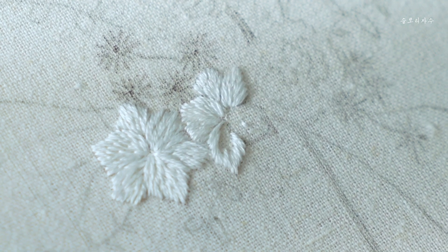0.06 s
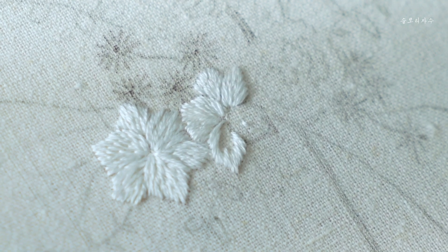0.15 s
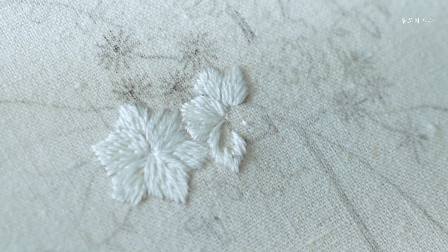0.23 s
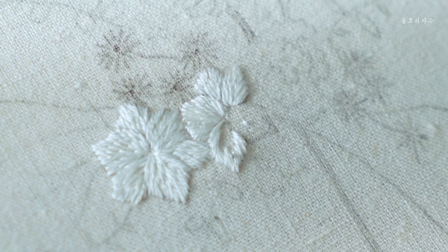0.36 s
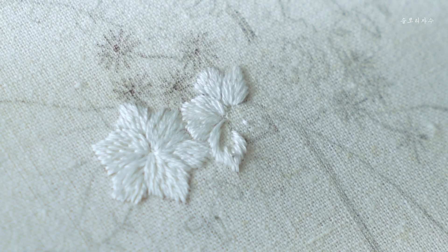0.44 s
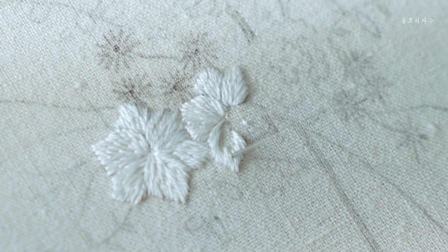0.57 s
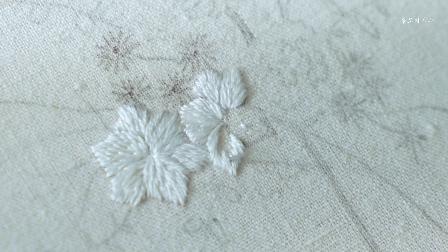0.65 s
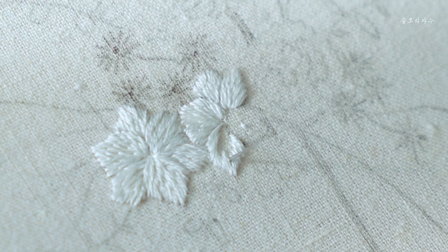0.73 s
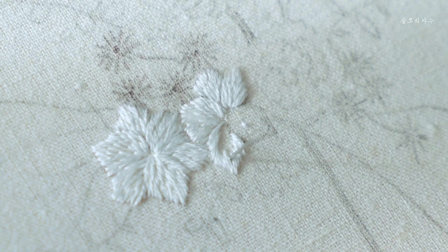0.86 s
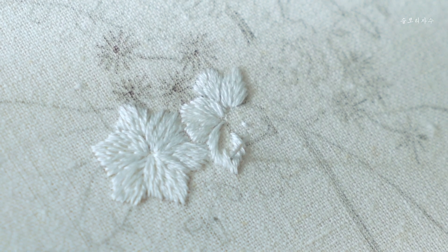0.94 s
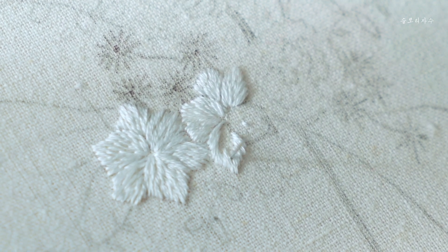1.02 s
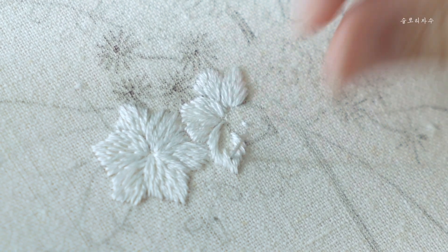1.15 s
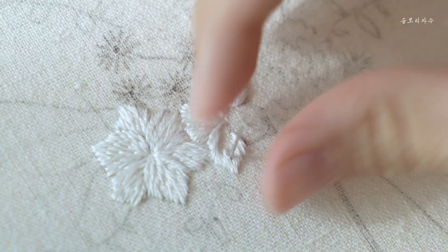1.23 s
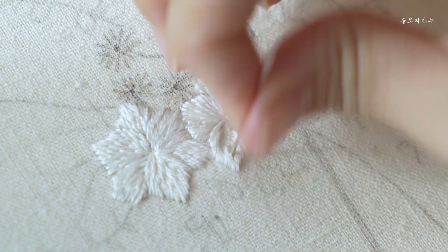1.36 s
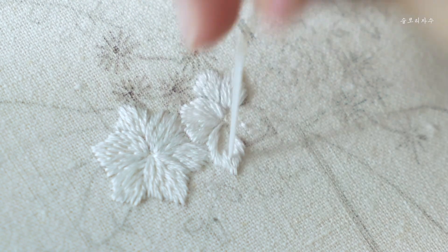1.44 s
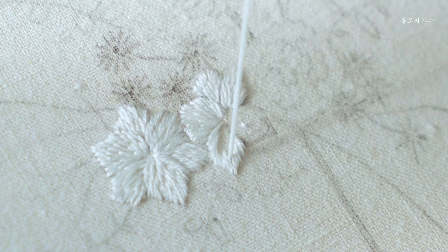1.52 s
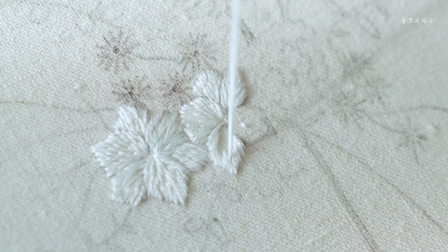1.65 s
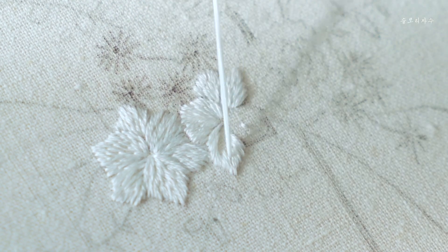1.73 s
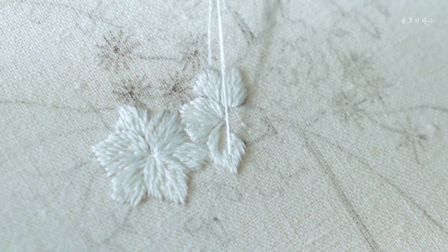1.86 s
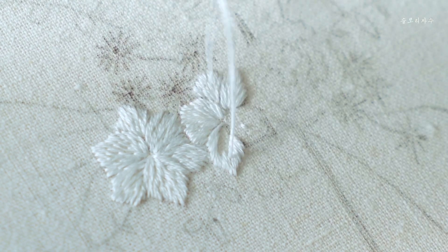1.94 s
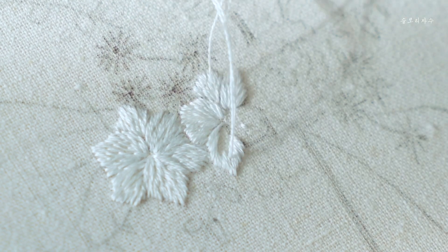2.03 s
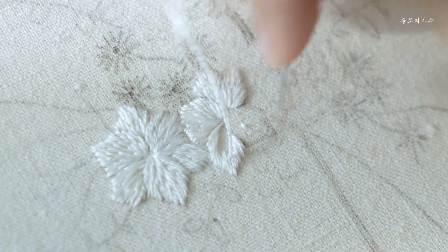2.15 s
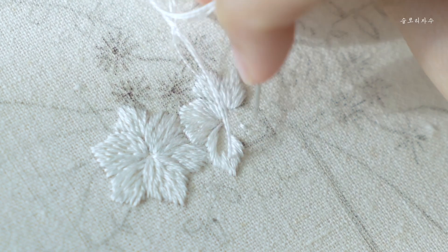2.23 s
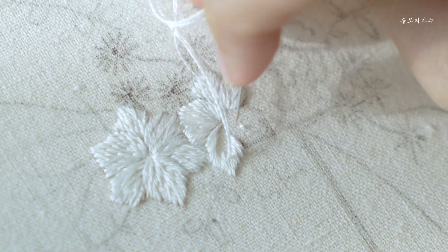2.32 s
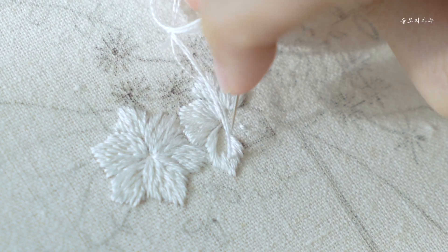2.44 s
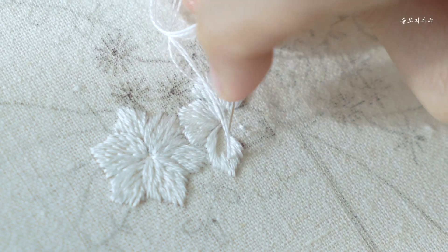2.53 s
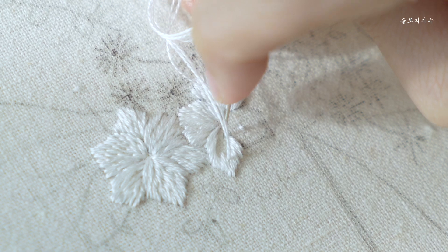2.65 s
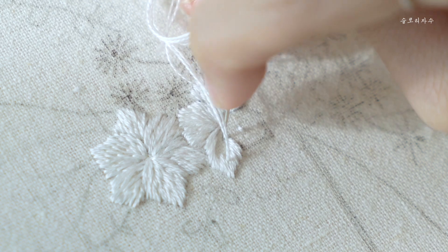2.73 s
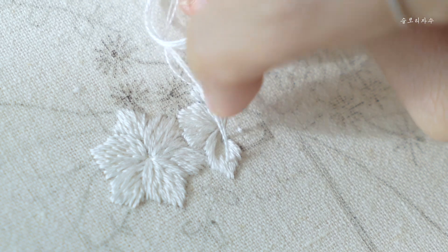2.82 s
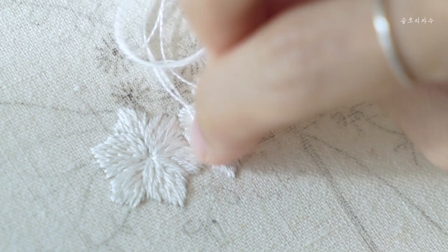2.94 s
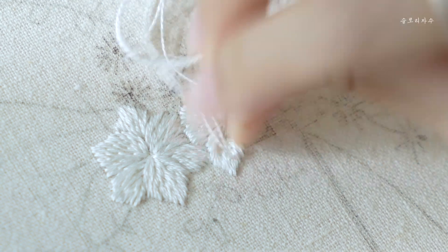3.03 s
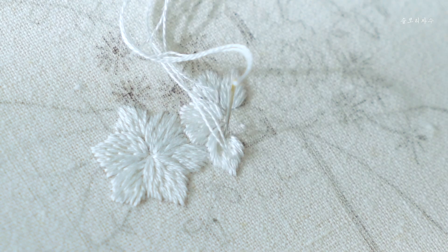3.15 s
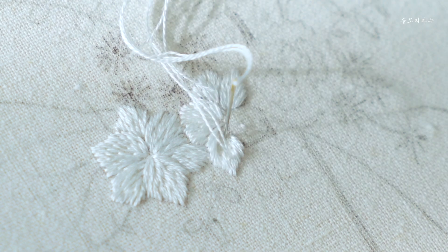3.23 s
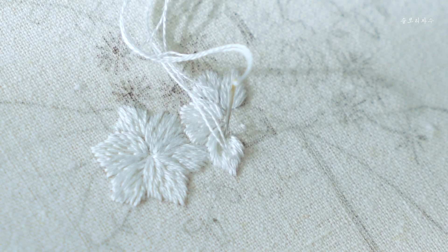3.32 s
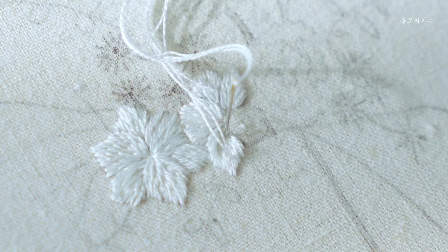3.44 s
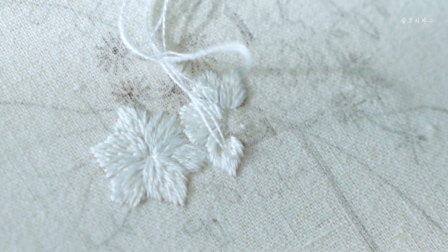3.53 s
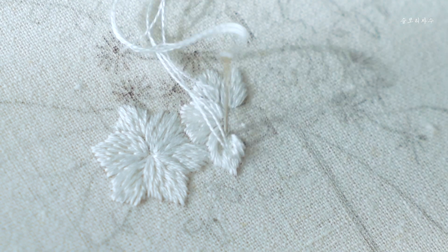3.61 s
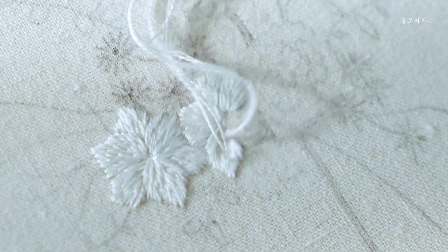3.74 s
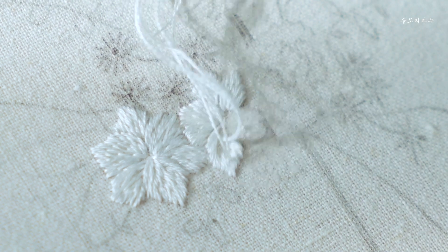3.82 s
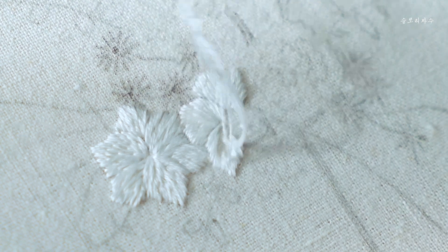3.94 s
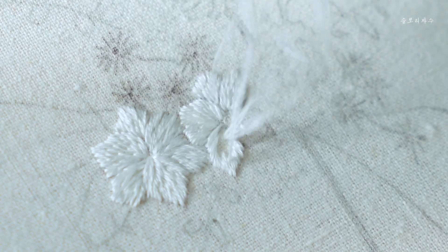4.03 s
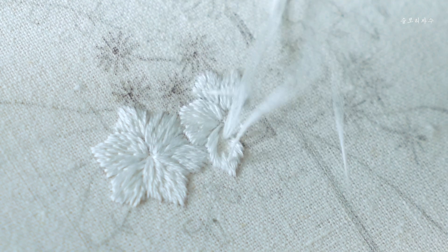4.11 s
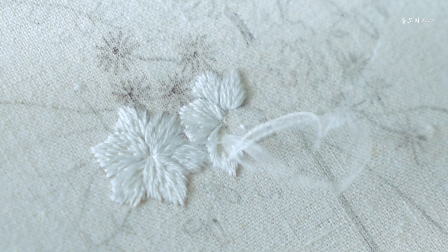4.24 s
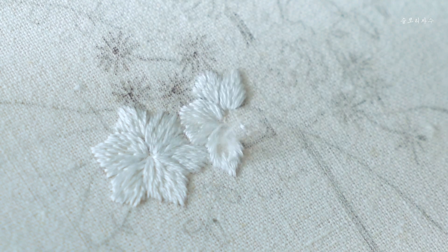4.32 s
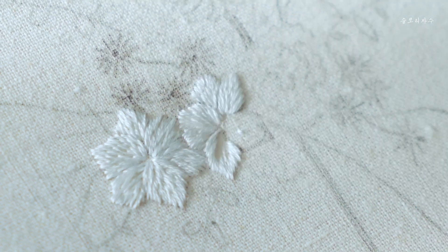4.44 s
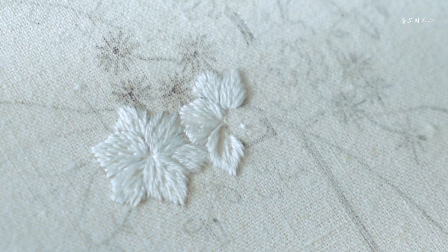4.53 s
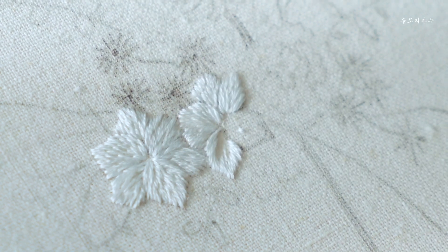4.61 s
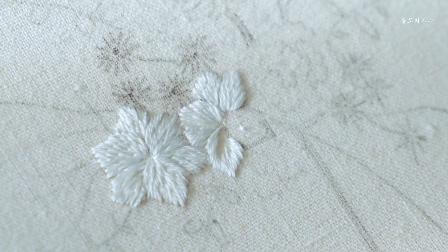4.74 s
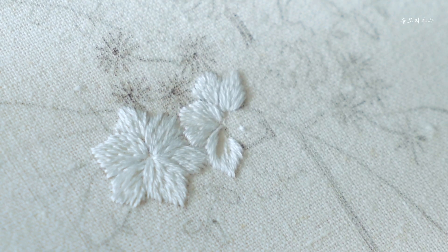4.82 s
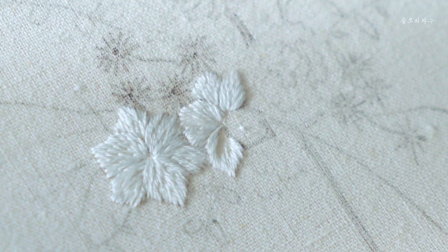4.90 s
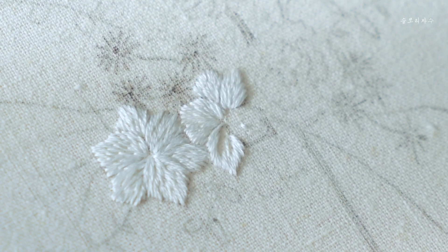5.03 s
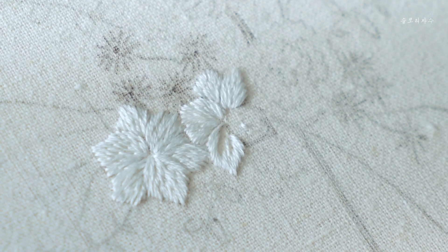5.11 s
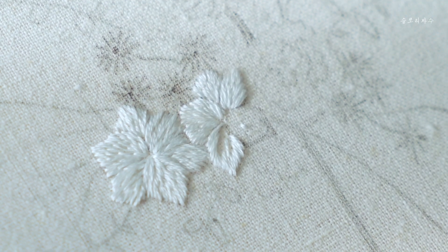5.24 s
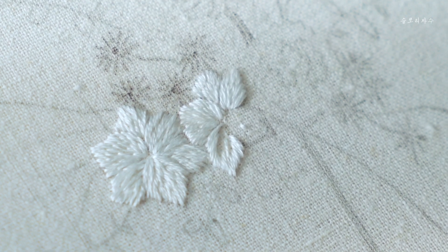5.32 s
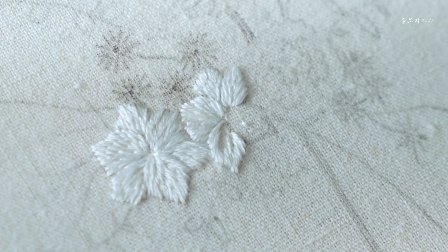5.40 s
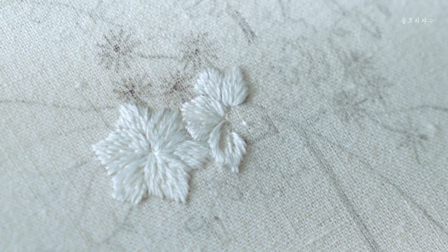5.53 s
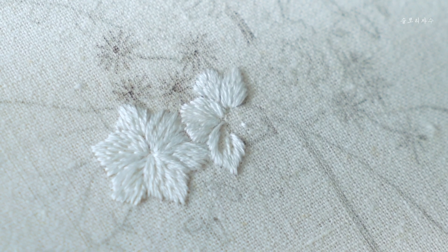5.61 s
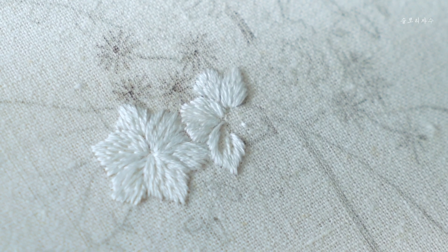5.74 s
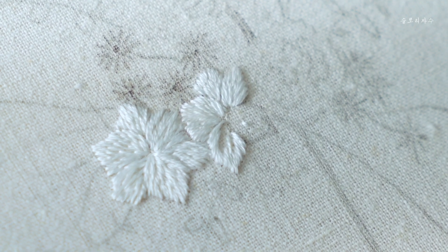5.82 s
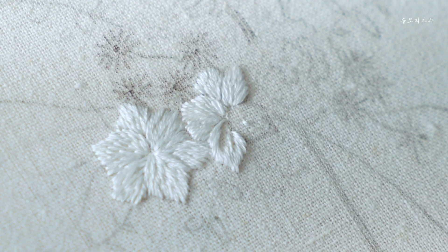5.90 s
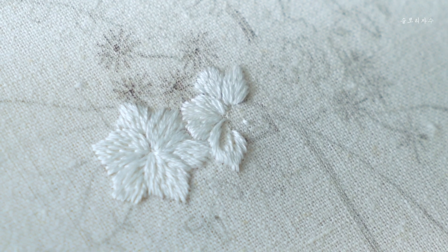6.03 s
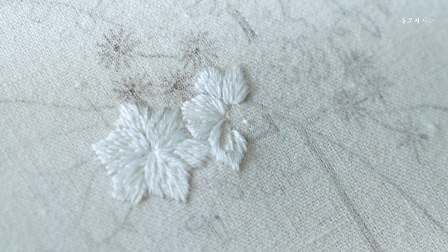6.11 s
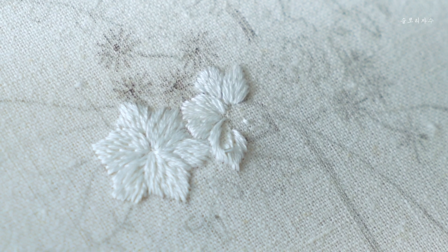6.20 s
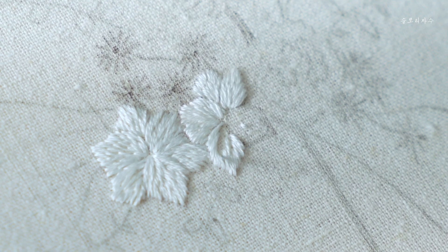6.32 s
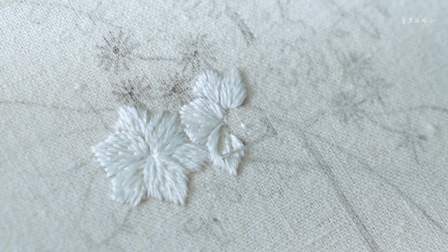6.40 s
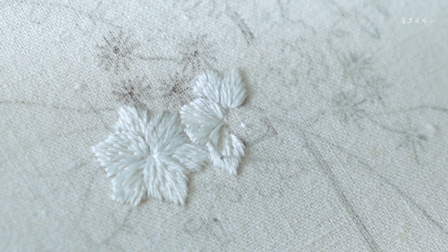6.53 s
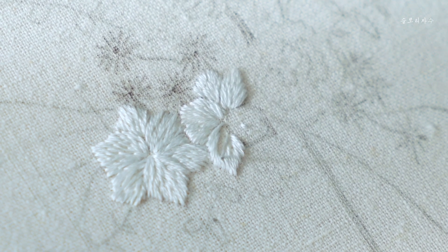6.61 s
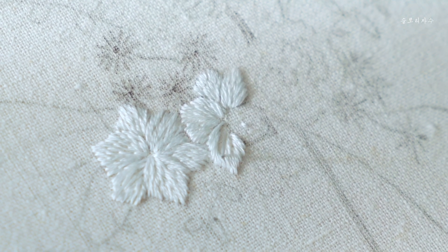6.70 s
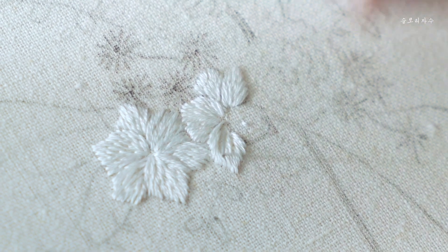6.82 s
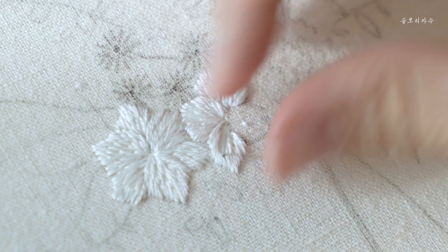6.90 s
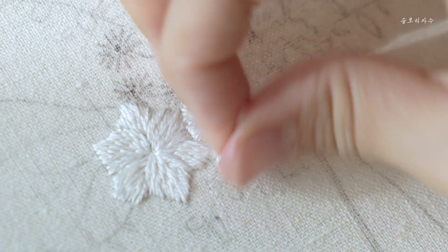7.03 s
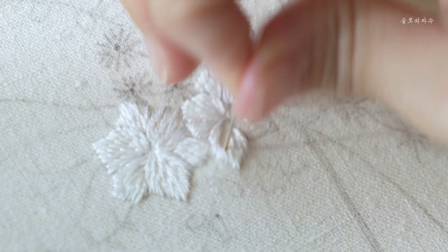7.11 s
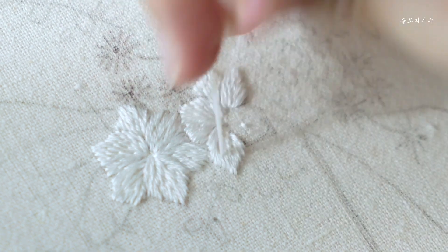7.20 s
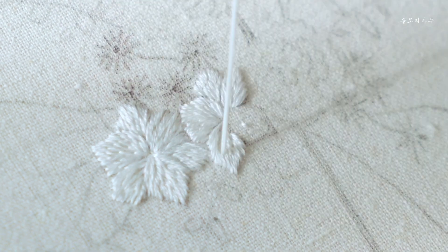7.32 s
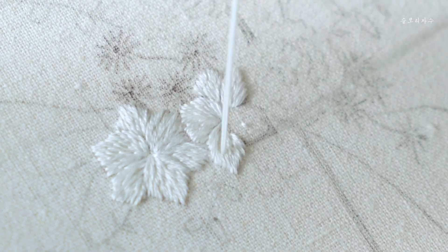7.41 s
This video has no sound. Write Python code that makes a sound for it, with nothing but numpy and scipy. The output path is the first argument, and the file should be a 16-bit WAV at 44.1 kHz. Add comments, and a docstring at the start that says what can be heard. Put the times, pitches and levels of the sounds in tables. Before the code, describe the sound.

Close hand embroidery on taut cloth: soft drum-like thumps, small needle ticks, and raspy, hissing thread pulls over steady low noise in a quiet room.

```python
"""Hand embroidery close to a stereo microphone, whose own steady noise lies under everything in a quiet room.
Cloth stretched in a hoop is a small soft drum: thumps by fingers and the needle's eye ring it from the start.
Light brushing follows, and just after 1 s the needle point ticks through. From about 1.4 s a strong thump leads
into a long pull: dragged thread shakes the same drum while its fibres hiss. Two more pulls come after 4 s,
then small thumps and brushes, a tick near 6.8 s, and the strongest thump with a pull that lasts to the end."""
import sys
import numpy as np
from scipy import signal
from scipy.fft import rfft, irfft, next_fast_len
from scipy.io import wavfile
from scipy.ndimage import uniform_filter1d

SR = 44100
rng = np.random.default_rng(int(sys.argv[2]) if len(sys.argv) > 2 else 0)


def transcribe(u):
    """Save the signal u as a 16-bit wav file named by the first command-line argument.

    u: samples, shape (n,) or (channels, n), limited to [-1, 1]; the rate is SR.
    q: integer samples, one column per channel.
    """
    v = np.clip(np.atleast_2d(u).T, -1, 1)
    q = np.round(v * 32767).astype(np.int16)
    wavfile.write(sys.argv[1], SR, q)


N = 328983  # length in samples

# Blows on the cloth. Each row: start in seconds, strength in dB, crack in dB (before a 0.5 dB lift),
# contact time in milliseconds, tilt in dB per octave.
THUMPS = [(0.06, -57, -45, 0.74, 10.5), (.1940, -49, -53, 0.82, 0), (.1980, -41.5, -53, 0.68, 3),
          (0.618, -67, -66, 0.82, -14.5), (1.321, -49, -75, 1.9, -4.5), (1.43, -24, -63, 1.36, -1),
          (1.4430, -13, -33, 0.77, -2.5), (1.4604, -42, -40, 1.05, 9), (2.229, -54.5, -72, 0.95, -7),
          (3.0328, -46, -61, 0.83, -3.5), (3.094, -54, -71, 1.6, -11), (3.616, -49, -70, 1.4, -2),
          (3.646, -58, -53, 1.1, 13.5), (3.8262, -42, -64, 0.94, 8.5), (3.8298, -24, -60, 1.78, 5.5),
          (4.05, -35.5, -41, 0.89, 4.5), (4.056, -21, -37, 1.8, -3.5), (4.691, -33, -42, 1.01, 7.5),
          (5.418, -54, -47, 0.33, -10.5), (5.869, -50.5, -70, 1.1, 7.5), (6.1149, -49.5, -54, 0.59, -3),
          (6.2505, -54, -59, .8, 6), (6.39, -52.5, -60, 0.73, -10), (6.548, -46, -70, 1.4, -3),
          (7.171, -30, -66, 1.17, 3.5), (7.174, -32, -70, 2.1, -3.5), (7.217, -9, -29.5, 0.94, -1)]


def undb(db):
    """Turn decibels into a gain."""
    return 10 ** (np.asarray(db) / 20)


def unit(x):
    """Scale to an rms (average strength) of 1."""
    return x / np.sqrt(np.mean(x ** 2))


def pan(x, db):
    """Place a sound between the channels by its left minus right level in dB."""
    return x * undb(np.array([[db], [-db]]) / 2)


def band(x, hz, width):
    """Resonant band-pass: let through what lies around hz."""
    return signal.lfilter(*signal.iirpeak(hz, hz / width, fs=SR), x)


def ring(x, hz, t60):
    """One mode, dying by 60 dB in t60 seconds, heard as its velocity; it builds up over about a cycle."""
    decay = np.exp(-np.log(1000) / (max(t60, 0.002) * SR))
    turn = 2 * np.pi * hz / SR
    velocity = signal.lfilter([1, -decay * np.cos(turn)], [1, -2 * decay * np.cos(turn), decay ** 2], x)
    return band(velocity, hz, 2.37 * hz)  # the slow build-up makes low modes come late


def slips(rate, spread_db):
    """Stick-slip: random jerks, about rate a second, of very uneven size and either sign; rms 1."""
    when, size, sign = rng.random((3, N))
    strength = undb(-spread_db * np.log(1 - size))
    return unit((when < rate / SR) * strength * np.sign(sign - 0.5))


def walk(rate):
    """Random levels held for 1 / rate seconds and smoothed twice; spread near 1."""
    hold = int(SR / rate)
    steps = np.repeat(rng.standard_normal(N)[:N // hold + 1], hold)[:N]
    return 1.16 * uniform_filter1d(uniform_filter1d(steps, hold), hold)


def floor():
    """Steady self-noise of the two capsules, with a little shared room rumble."""
    # Colour of the noise. Each row: frequency in Hz, relative level per Hz in dB.
    noise_curve = [(15, -55), (25, -27), (52, -2), (149, -2), (223, -3.5), (256, -3), (384, -3.5),
                   (416, -5), (1440, -13.5), (1700, -14.5), (2840, -18), (14400, -24), (16000, -25)]
    curve_hz, curve_db = np.transpose(noise_curve)
    size = next_fast_len(N)
    hz = np.maximum(np.fft.rfftfreq(size, 1 / SR), 1)
    colour = undb(np.interp(np.log(hz), np.log(curve_hz), curve_db))
    own = rfft(rng.standard_normal((2, N)), size)
    shared = rfft(rng.standard_normal(N), size) * 0.5 / (1 + hz / 1500)
    noise = irfft(colour * (own + shared), size)[:, :N]
    return pan(unit(noise) * undb(-58.5), -0.054)


def cloth(drag_db, middle_db, rasp_db, drag_tilt):
    """Blows and the slipping thread ring the same drum modes; the dent of a blow is also heard directly."""
    # Modes of the stretched cloth. Each row: frequency in Hz, level in dB, time to fall 60 dB in seconds,
    # left minus right level in dB.
    drum_modes = [(71, 0.5, 0.088, -7), (118.3, -6.5, 0.055, -27.5), (150.8, 4, 0.1, -4),
                  (220, -4.5, 0.0067, -18.5), (281.7, 2, 0.093, -4.5), (323.2, -2.5, 0.11, 0.5),
                  (375.4, 3.5, 0.11, -5), (436, -43, 0.093, 9), (508, 0, 0.089, -0.5),
                  (611, -7, 0.085, -7.5), (773, -20.5, 0.29, -2), (924, -14, 0.05, 5),
                  (1020, -40, 0.017, -13), (1237, -6.5, 0.025, 1.5), (1358, -2.5, 0.016, -3.5),
                  (1467, -11, 0.039, -6.5), (1634, -15, 0.068, -1), (1727, -21.5, 0.094, -6)]
    # Rows of THUMPS, counted from 0, that push the cloth away from the microphone.
    downward_rows = [4, 5, 9, 10, 14, 15, 16, 24]
    middle_hz, rasp_hz = 430, 850  # where the middle and the high modes begin
    # how strongly the thread drives low, middle and high modes, and blows drive all of them (dB)
    drag_coupling_db, middle_coupling_db, rasp_coupling_db, blow_coupling_db = -35, -24.5, -17, -11

    jerks = slips(3000, spread_db=2.0)
    scatter = rng.standard_normal((len(THUMPS), len(drum_modes)))
    out, dent = np.zeros((2, N)), np.zeros(N)
    pushes = []
    for row, (start, blow_db, _, contact_ms, _) in enumerate(THUMPS):
        # softer contact = longer push
        push = np.hanning(int(np.clip(contact_ms, 0.05, 8) * SR / 1000) + 3)
        push = push * undb(blow_db) * (-1 if row in downward_rows else 1)
        pushes.append(push)
        i = int(start * SR)
        dent[i:i + len(push)] += push

    for k, (hz, mode_db, t60, pan_db) in enumerate(drum_modes):
        octaves = np.log2(hz / 300)  # tilts pivot at 300 Hz
        if hz <= middle_hz:
            rub_db = drag_db + drag_coupling_db + drag_tilt * octaves
        elif hz < rasp_hz:
            rub_db = middle_db + middle_coupling_db
        else:
            rub_db = rasp_db + rasp_coupling_db
        force = rng.permutation(jerks) * undb(rub_db)  # every mode feels its own run of slips
        for (start, blow_db, _, _, tilt), push, place in zip(THUMPS, pushes, scatter):
            i = int(start * SR)
            # each blow lands elsewhere and favours other modes
            kick_db = blow_db + blow_coupling_db + tilt * octaves + 1.5 * place[k]
            force[i:i + len(push)] += push / abs(push.sum()) * undb(kick_db)
        out += pan(undb(mode_db) * ring(force, hz, t60), pan_db)
    out += pan(band(dent, 1170, 2700), -6)
    # the weave damps anything faster than 2000 Hz
    return signal.sosfilt(signal.butter(4, 2000, fs=SR, output="sos"), out)


def cracks():
    """The brief dry snap of fibres at each blow: a burst of noise that fades within milliseconds."""
    out = np.zeros(N)
    t = np.arange(int(0.02 * SR)) / SR
    for start, _, crack_db, *_ in THUMPS:
        i = int(start * SR)
        out[i:i + len(t)] += undb(crack_db + 0.5) * rng.standard_normal(len(t)) * np.exp(-t / 0.003)
    return pan(band(out, 1800, 3400), -2.3)


def room(x):
    """Short diffuse echoes from the table and nearby walls, a little different in each channel."""
    t60 = 0.2  # seconds for the echoes to fall 60 dB
    t = np.arange(int(0.25 * SR)) / SR
    echoes = rng.standard_normal(len(t)) + 0.25 * rng.standard_normal((2, len(t)))
    echoes *= np.exp(-np.log(1000) * t / t60) * np.clip(t / 0.0089, 0, 1)  # swell in, then die away
    echoes = band(echoes, 670, 4300)
    echoes /= np.sqrt(np.sum(echoes ** 2, axis=1)[:, None])
    return x + undb(-14) * signal.fftconvolve(x, echoes, axes=1)[:, :N]


def drags():
    """Levels over time for the low, middle and high modes, hiss and air, and the tilt, from all rubbing."""
    # Fingers, needle and slack thread brush the cloth. Each row: loudest moment in seconds, swell in seconds,
    # fade in seconds, drag in dB, tilt in dB per octave, hiss in dB, air (upper hiss) over the hiss in dB.
    brush_rows = [(0.616, 0.066, 0.063, -55, 3.5, -66, 1.5), (0.75, 0.14, 0.045, -68, 4, -72, -0.5),
                  (1.335, 0.044, .04, -53, -2, -71, -1), (1.415, 0.067, 0.026, -47.5, 0.5, -65, -0.5),
                  (2.244, 0.027, .03, -65, -5, -70, -7), (2.28, 0.027, 0.08, -72, 3, -71, -1),
                  (2.96, 0.057, 0.087, -55.5, 0, -67, -5), (3.026, 0.09, .06, -57, 11, -65, -0.5),
                  (3.093, .035, 0.021, -53, -5, -65.5, -2), (3.61, 0.023, .05, -61.5, -7.5, -80, -3),
                  (3.646, 0.02, 0.054, -59, 7, -66, -3), (3.78, 0.1, 0.069, -52.5, 3, -68.5, -3),
                  (3.811, 0.035, 0.013, -48.5, -9.5, -76, -7), (3.955, 0.092, 0.033, -56.5, -4, -94, -0.5),
                  (5.272, 0.022, 0.048, -65, 1, -63, 1), (6.258, 0.052, 0.12, -51.5, 4, -67.5, -0.5),
                  (6.324, 0.052, 0.031, -52, 2, -66.5, -1.5), (6.39, 0.022, 0.11, -58.5, -5, -70, -3),
                  (6.56, 0.086, .06, -55.5, -0.5, -71, -7), (7.034, 0.073, 0.11, -62, -3, -65, -0.5),
                  (7.136, 0.063, .04, -48.5, -3, -63.5, -3.5), (7.165, 0.054, 0.016, -46.5, -6, -65, -8)]
    # Thread pulled through the weave, one curve a pull. Each row of a curve: time in seconds,
    # drag on the cloth in dB, sliding hiss in dB, tilt of the drum in dB per octave.
    pull_curves = [
        [(1.45, -46, -59, 0), (1.503, -37, -58, 3.5), (1.569, -35, -57, 4), (1.677, -39, -58.5, 4),
         (1.735, -38, -56.5, 1), (1.813, -44, -59.5, 2), (1.845, -55, -74, -5), (1.89, -75, -78, -5)],
        [(4.057, -39, -61, 2), (4.14, -37, -60, 2), (4.262, -35.5, -58.5, 3), (4.29, -39, -59, 7),
         (4.335, -31.5, -55.5, 8), (4.365, -36, -57.5, 4), (4.4, -33.5, -57.5, -2), (4.434, -52, -79, 3),
         (4.474, -65, -75, -1.5)],
        [(4.64, -67, -76, -3), (4.66, -47, -77, 4), (4.696, -32, -54, -0.5), (4.762, -34, -62, -1.5),
         (4.822, -34, -55.5, 0.5), (4.938, -31, -59.5, -1.5), (4.974, -59, -73, 1), (5.018, -65, -88, -4)],
        [(7.227, -43, -63, 2), (7.278, -36.5, -58.5, -2.5), (7.338, -36.5, -57, 3), (7.37, -33, -56.5, 6.5),
         (7.442, -33.5, -55, -0.5), (7.47, -25, -58, -1.5)],
    ]
    # What each pull keeps throughout. Each row: middle modes over the drag in dB,
    # rasp (high modes) over the hiss in dB, air over the hiss in dB.
    pull_colours = [(-8.5, 4.5, 0.5), (-9.5, 3.5, 1), (-10.5, 5.5, -9), (-11.5, 3.5, 1)]
    catch_s, let_go_s = 0.005, 0.012  # a pull sets in and stops this quickly (60 dB)
    flank_db = 20.5  # how far a brush lies below its peak one swell before and one fade after
    brush_middle_db, brush_rasp_db = -9, -1  # middle modes over the drag, rasp over the hiss
    middle_octaves = 0.47  # how far up the tilt the middle modes sit

    t = np.arange(N) / SR
    contacts = []
    for curve, (middle_db, rasp_db, air_db) in zip(pull_curves, pull_colours):
        times, drag_db, hiss_db, slope = np.transpose(curve)
        outside = np.maximum((times[0] - t) / catch_s, (t - times[-1]) / let_go_s)
        off_db = -60 * np.clip(outside, 0, 2)
        drag_now = np.interp(t, times, drag_db) + off_db
        hiss_now = np.interp(t, times, hiss_db) + off_db
        contacts.append((drag_now, hiss_now, np.interp(t, times, slope), middle_db, rasp_db, air_db))
    for peak, swell, fade, drag_db, slope, hiss_db, air_db in brush_rows:
        off_db = -flank_db * np.maximum((peak - t) / swell, (t - peak) / fade) ** 2
        contacts.append((drag_db + off_db, hiss_db + off_db, slope, brush_middle_db, brush_rasp_db, air_db))

    levels, tilt = np.full((5, N), -110.0), np.zeros(N)
    for drag_db, hiss_db, slope, middle_db, rasp_db, air_db in contacts:
        tilt = np.where(drag_db > levels[0], slope, tilt)  # the strongest contact rules
        middle_now = drag_db + middle_db + middle_octaves * slope
        levels = np.maximum(levels, [drag_db, middle_now, hiss_db + rasp_db, hiss_db, hiss_db + air_db])
    flutter = [0.65 * walk(22) for _ in levels]  # uneven twist of the thread: dB, changes a second
    return (*(levels + flutter), tilt)


def fibres(hiss_db, air_db):
    """Dense tiny slips of the fibres, coloured by resonances; partly unlike in the two channels."""
    # Resonances of the hiss. Each row: frequency in Hz, width in Hz, level in dB.
    hiss_modes = [(1940, 220, -0.5), (2346, 130, 3.5), (2535, 105, 3), (2810, 260, -1), (3133, 105, 1.5),
                  (3430, 125, 4), (3735, 140, 0.5), (4006, 140, 2.5), (4370, 165, 4), (4700, 200, -1),
                  (4920, 100, 5), (5310, 125, 4), (5800, 260, -1.5), (6380, 260, -4.5)]
    # Resonances of the upper hiss. Each row: frequency in Hz, width in Hz, level in dB.
    air_modes = [(7500, 1150, -10), (8430, 540, -6.5), (9330, 590, -6), (10500, 770, -6.5),
                 (12100, 1600, -12), (13500, 820, -14), (14700, 1500, -18.5)]
    out = np.zeros((2, N))
    for modes, level_db, pan_db in ((hiss_modes, hiss_db, -1.8), (air_modes, air_db, -0.3)):
        mid = slips(9000, spread_db=2.5)
        side = slips(9000, spread_db=2.5)
        both = mid + 0.3 * side * np.array([[1], [-1]])
        hiss = np.zeros((2, N))
        for k, (hz, width, mode_db) in enumerate(modes):
            resonance = band(band(both, hz, width), hz, 3 * width)
            hiss += (-1) ** k * undb(mode_db) * resonance  # neighbours take opposite signs
        out += pan(unit(hiss), pan_db) * undb(level_db)
    return out


def needle():
    """Sharp ticks: a snap and two slips ring the needle and the cloth patch round it; torn fibres crackle."""
    # The needle point snaps through the taut weave. Each row: start in seconds, level in dB,
    # tilt in dB per octave.
    tick_rows = [(1.132, -52, 1), (6.8346, -48, 0.5)]
    # Modes of needle and patch. Each row: frequency in Hz, level in dB, time to fall 60 dB in seconds.
    needle_modes = [(347, 5.5, 0.028), (480, 0, 0.045), (600, 2, 0.044), (703, 6.5, 0.045),
                    (840, -6.5, 0.039), (1050, -2.5, 0.045), (1540, -12, 0.047), (2200, -6.5, 0.021),
                    (2466, -0.5, 0.035), (2680, 0.5, 0.016), (5650, -1.5, 0.0037), (8900, -5.5, 0.0067)]
    patch_hz = 1600  # below it the modes are those of the cloth patch
    patch_late = int(0.00208 * SR)  # the patch springs back this many samples after the snap
    out = np.zeros(N)
    t = np.arange(int(0.15 * SR)) / SR
    for start, tick_db, tilt in tick_rows:
        crackle = rng.standard_normal(len(t)) * np.exp(-t / 0.0043)
        force = undb(-28.5) * rng.standard_normal(len(t)) * np.exp(-t / 0.014)
        force[[0, int(0.0035 * SR), int(0.012 * SR)]] += undb([5, 0.1, -14])  # the snap, then two slips
        tick = band(crackle, 6000, 9900)
        for k, (hz, mode_db, t60) in enumerate(needle_modes):
            felt = np.roll(force, patch_late) if hz < patch_hz else force
            gain = undb(mode_db + tilt * np.log2(hz / 700))
            tick += (-1) ** k * gain * ring(felt, hz, t60)
        i = int(start * SR)
        out[i:i + len(t)] += undb(tick_db) * tick
    return pan(out, -4.4)


def scene():
    """All sources at the microphone; the room echoes everything but the microphone's noise."""
    drag_db, middle_db, rasp_db, hiss_db, air_db, tilt = drags()
    drum = cloth(drag_db, middle_db, rasp_db, tilt)
    return room(drum + cracks() + fibres(hiss_db, air_db) + needle()) + floor()


def record(dry):
    """Cut the deepest bass steeply below 54 Hz, and the top above 15750 Hz."""
    dry = signal.sosfilt(signal.butter(5, 54, "high", fs=SR, output="sos"), dry)
    return signal.sosfilt(signal.ellip(10, 0.2, 80, 15750, fs=SR, output="sos"), dry)


dry = scene()
out = record(dry)
transcribe(out)
```